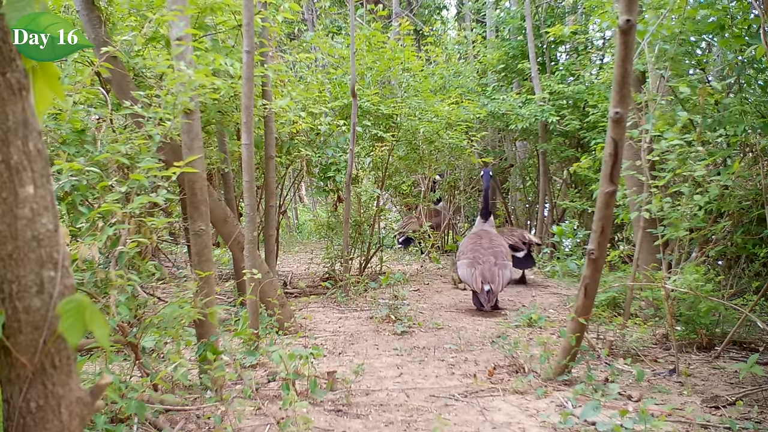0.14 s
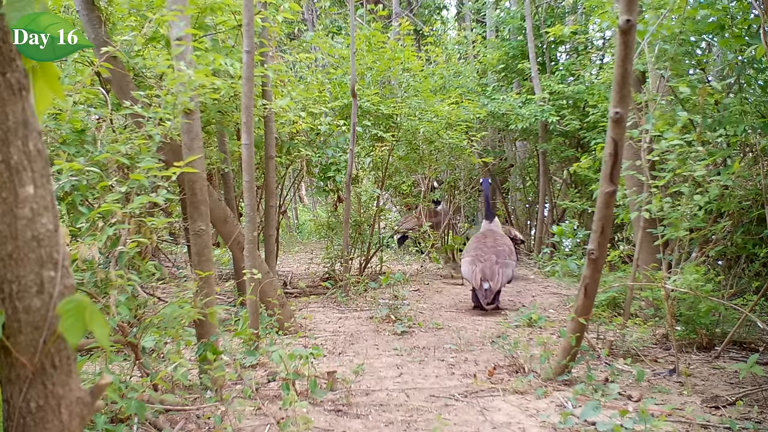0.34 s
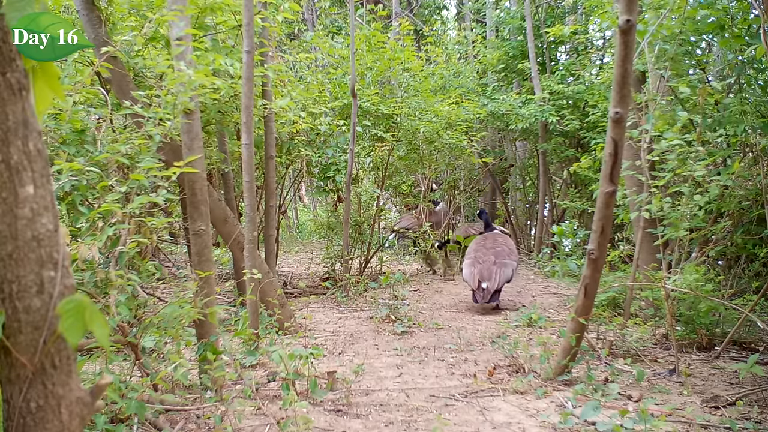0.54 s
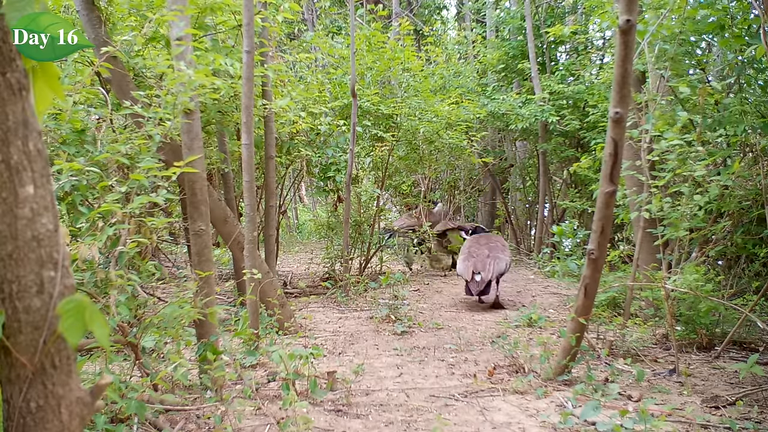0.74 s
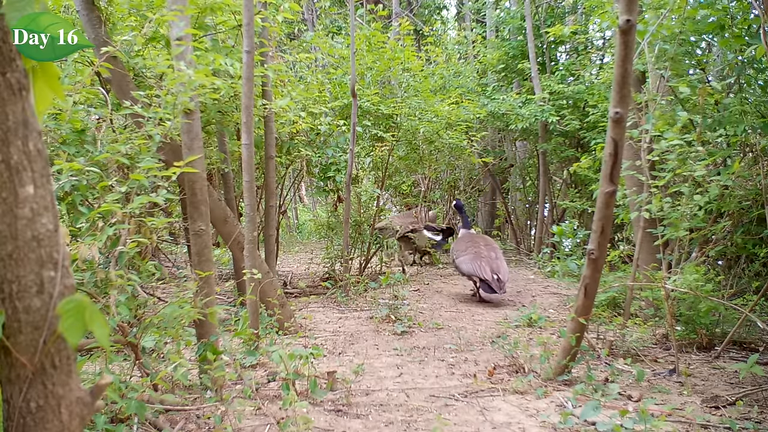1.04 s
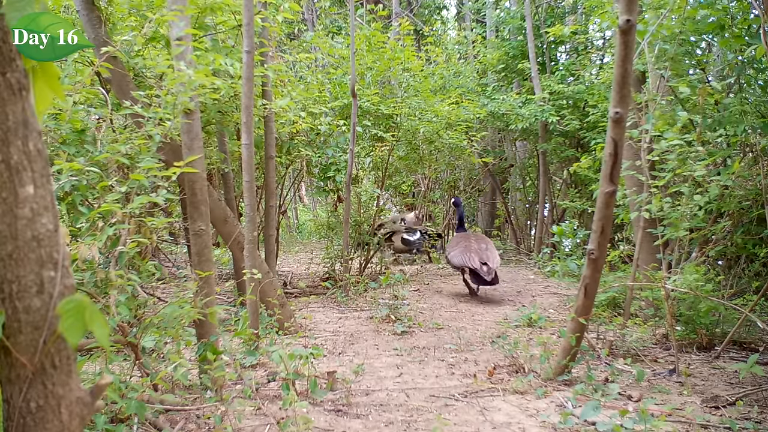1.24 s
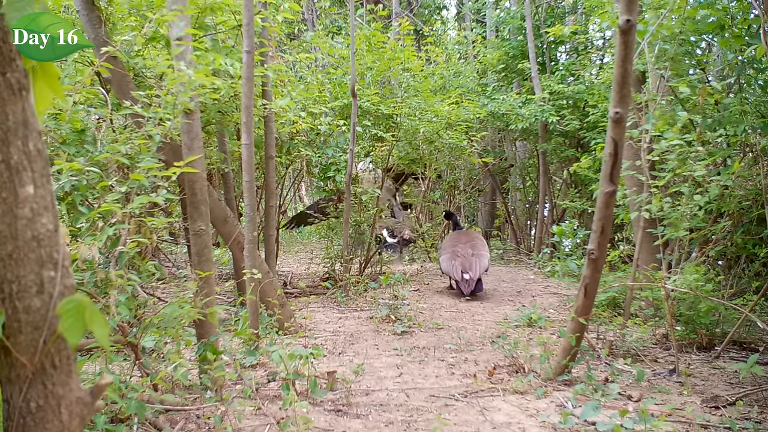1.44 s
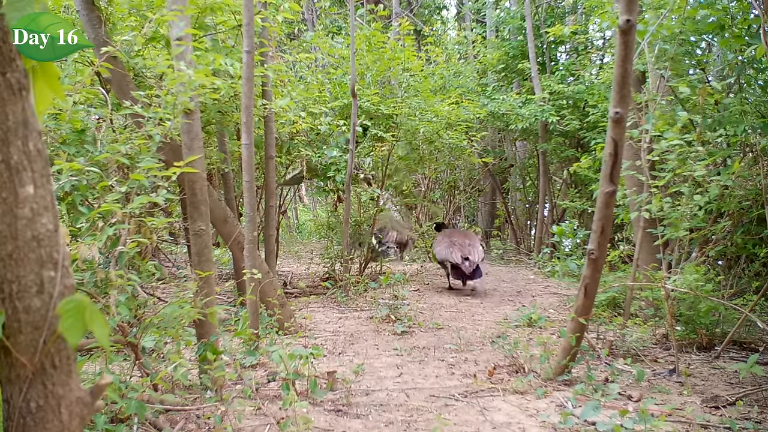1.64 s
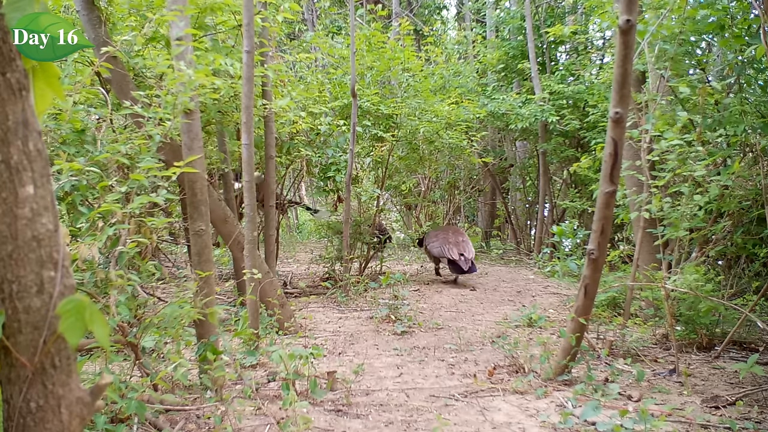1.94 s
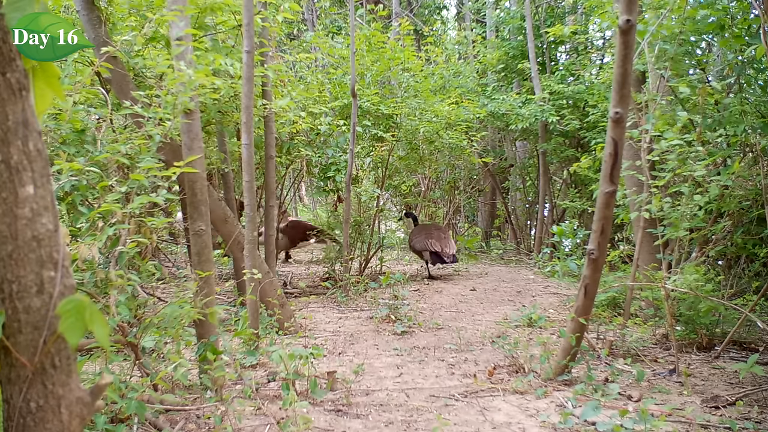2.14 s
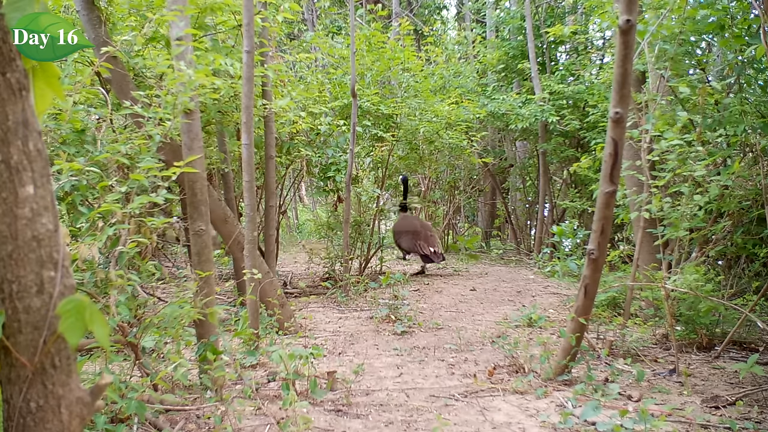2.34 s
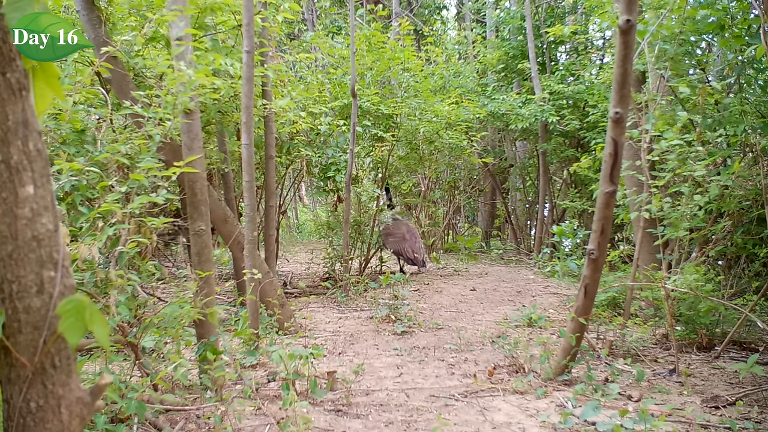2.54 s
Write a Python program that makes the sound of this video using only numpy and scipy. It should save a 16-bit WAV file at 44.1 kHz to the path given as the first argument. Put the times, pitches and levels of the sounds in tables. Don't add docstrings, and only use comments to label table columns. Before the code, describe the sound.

Several geese honk in quick, short, overlapping bursts with grunts and rasps in a small wood

```python
import sys
import numpy as np
from scipy import signal
from scipy.fft import rfft, irfft, next_fast_len
from scipy.io import wavfile
from scipy.ndimage import uniform_filter1d, map_coordinates

SR = 44100
rng = np.random.default_rng(int(sys.argv[2]) if len(sys.argv) > 2 else 0)


def convert_level_to_amplitude(level_db):
    exponent = np.asarray(level_db, float) / 20
    return 10 ** exponent


def file_out(sig):
    cols = np.atleast_2d(sig).T
    lim = np.clip(cols, -1, 1)
    pcm = np.round(lim * 32767).astype(np.int16)
    wavfile.write(sys.argv[1], SR, pcm)


N = 119070


def unit(x):
    return x / np.sqrt(np.mean(x ** 2) + 1e-20)


def along(points, hz):
    f, v = np.transpose(points)
    return np.interp(np.log(hz + 1), np.log(f + 1), v, left=-120)


def wobble(rate, size=N):
    knots = rng.standard_normal(int(size * rate / SR) + 4)
    return map_coordinates(knots, [np.arange(size) * rate / SR])


def coloured(x, spectrum):
    m = next_fast_len(N + 8192)
    gain = convert_level_to_amplitude(along(spectrum, np.fft.rfftfreq(m, 1 / SR)))
    return unit(irfft(rfft(x, m) * gain, m)[:N])


def swell(u, peak, sharp):
    peak = np.clip(peak, .05, .95)
    ramp = np.minimum(u / peak, (1 - u) / (1 - peak))
    return np.sin(np.pi / 2 * np.clip(ramp, 0, 1)) ** sharp


def add(out, s, x):
    part = out[round(s * SR):][:len(x)]
    part += x[:len(part)]


# (frequency [Hz], density [dB per Hz])
HUM_COLOUR = [(88, -45.5), (150, -11), (351, -8), (425, -5.5), (601, -3), (715, -3), (1410, -5.5),
              (1760, -6.5), (9500, -44), (12400, -71), (20900, -120)]


def distant_hum():
    z = signal.stft(rng.standard_normal(N), nperseg=512)[2]
    field = uniform_filter1d(rng.standard_normal(z.shape), 6, 0)
    field = uniform_filter1d(field, 10, 1)
    patchy = signal.istft(z * convert_level_to_amplitude(0.86 * unit(field)), nperseg=512)[1][:N]
    return convert_level_to_amplitude(-42.5 + 0.17 * wobble(2.9)) * coloured(patchy, HUM_COLOUR)


# (frequency [Hz], density [dB per Hz])
RUMBLE_COLOUR = [(15, 12), (30, 11.5), (55, 1.5), (90, -2.5), (125, 6.5), (160, -13), (250, -65)]
# (time [s], level [dB])
WIND_GUST = [(0, 0.5), (1.9, -0.5), (2.1, 2), (2.7, 0)]


def wind_rumble():
    gust_db = np.interp(np.arange(N) / SR, *np.transpose(WIND_GUST))
    rumble = coloured(rng.standard_normal(N), RUMBLE_COLOUR)
    return convert_level_to_amplitude(-56.5 + gust_db + wobble(1.7)) * rumble


def wind_puff(t):
    start_s, length_s, pitch_hz, level_db = 1.19, .08, 45, -46
    push = swell((t - start_s) / length_s, peak=.5, sharp=2)
    return convert_level_to_amplitude(level_db) * push * np.sin(2 * np.pi * pitch_hz * t)


# (frequency [Hz], density [dB per Hz])
HISS_COLOUR = [(6000, -2.5), (9000, 0), (15600, -3.5)]


def microphone_hiss():
    return convert_level_to_amplitude(-80) * coloured(rng.standard_normal(N), HISS_COLOUR)


# (frequency [Hz], level [dB])
CLOCK_TONES = [(10002, -101), (10998, -101), (11999, -102), (13001, -104)]


def camera_whine(t):
    whine_hz, flip_hz, whine_db = 7824.5, 29.6, -70
    flip = np.tanh(12 * np.sin(2 * np.pi * flip_hz * t))
    whine = convert_level_to_amplitude(whine_db) * np.sqrt(2) * np.sin(2 * np.pi * whine_hz * t) * flip
    clock = sum(np.sqrt(2) * convert_level_to_amplitude(db) * np.sin(2 * np.pi * hz * t) for hz, db in CLOCK_TONES)
    return whine + clock


# (delay [s], level [dB])
TRUNK_ECHOES = [
    (.021, -19),
    (.037, -17),
    (.058, -20),
    (.085, -22),
]
# (frequency [Hz], time [s])
WOOD_FADE = [(300, .18), (1400, .24), (5000, .14)]


def wood(x):
    hz, t, z = signal.stft(rng.standard_normal(SR // 2), SR, nperseg=256)
    fade = convert_level_to_amplitude(-60 * t / np.abs(along(WOOD_FADE, hz))[:, None])
    tail = signal.istft(z * fade, SR, nperseg=256)[1]
    tail *= convert_level_to_amplitude(-15) / np.linalg.norm(tail)
    for s, db in TRUNK_ECHOES:
        tail[round(s * SR)] += convert_level_to_amplitude(db)
    highpass = signal.butter(2, 975, "high", fs=SR, output="sos")
    return signal.fftconvolve(signal.sosfilt(highpass, x), tail)[:N]


# (start [s], length [s], level [dB])
MOVEMENTS = [(0.489, 0.14, -37.5), (0.605, 0.021, -38), (0.741, 0.29, -40.5), (0.757, 0.0042, -48),
             (0.885, 0.11, -35), (1.084, 0.095, -49), (1.345, 0.068, -33.5), (1.492, 0.0039, -33.5),
             (1.493, 0.094, -46), (1.608, 0.011, -33.5), (2.048, 0.018, -39.5), (2.024, 0.091, -44.5),
             (2.361, 0.087, -40), (2.499, 0.036, -45.5)]
# (frequency [Hz], density [dB per Hz])
LEAF_COLOUR = [(300, -17.5), (1000, 13), (2500, 9.5), (4500, -2.5), (7000, -15.5), (9000, -29),
               (12000, -55)]


def rustles():
    effort = np.zeros(N)
    for s, length, db in MOVEMENTS:
        u = np.arange(round(length * SR)) / SR / length
        add(effort, s, convert_level_to_amplitude(db) * swell(u, peak=.45, sharp=.7))
    crackles_per_s, spread_db = 1500, 3
    draw = rng.random((2, N))
    crackles = (draw[0] < crackles_per_s / SR) * convert_level_to_amplitude(-spread_db * np.log(draw[1] + .02))
    grain = (2.2 + unit(crackles)) * rng.standard_normal(N)
    return effort * convert_level_to_amplitude(1.5 * wobble(70)) * coloured(grain, LEAF_COLOUR)


# (frequency [Hz], density [dB per Hz])
BREATH_COLOUR = [(300, -26.5), (600, -17), (1300, 0), (1900, -6.5), (3000, -11), (4500, -31), (7000, -43),
                 (9500, -63.5)]


def breath():
    return coloured(rng.standard_normal(N), BREATH_COLOUR)


# (pitch jitter [fraction], air [dB], cycles per uneven pattern [count], undertones [dB])
CLEAR_VOICE = (.006, -20, 2, -30)
REEDY_VOICE = (.007, -20, 3, -17)
BROKEN_VOICE = (.005, -16, 2, -6)
BUZZY_VOICE = (.008, -11, 2, -18)
GARGLED_VOICE = (.003, -22, 3, -10)
RINGING_VOICE = (.008, -18, 2, -11)
THROBBING_VOICE = (.004, -19, 8, -15)


def voice(hz, throat, quality, air, shut_db=None):
    jitter, air_db, cycles, under_db = quality
    n, size = len(hz), 8192
    hz = hz * (1 + jitter * wobble(130, size)[:n])
    turn = 2 * np.pi * np.cumsum(hz) / SR
    k = np.arange(1, 61)[:, None] / cycles
    knots, at = rng.standard_normal((len(k), 16)), np.arange(n) * 70 / SR
    i = at.astype(int)
    flicker_db = 3 * (knots[:, i] * (i + 1 - at) + knots[:, i + 1] * (at - i))
    db = along(throat, k * hz) + (under_db + 3 * wobble(45, size)[:n]) * (k % 1 > 0)
    waves = np.cos(k * turn + .6 * rng.standard_normal(k.shape))
    if shut_db is None:
        tone = unit((convert_level_to_amplitude(db + flicker_db) * waves).sum(0))
    else:
        db = db - along(throat, 2 * hz) + flicker_db * (k != 2)
        db = np.where(k == 1, shut_db, db)
        tone = np.sqrt(2) * (convert_level_to_amplitude(db) * waves).sum(0)
    return tone + convert_level_to_amplitude(air_db) * np.resize(air, n) * (1 + .7 * np.cos(turn))


def goose(calls, throat, quality, arch, peak, sharp):
    out, air = np.zeros(N), breath()
    for s, length, first_hz, last_hz, db in calls:
        u = np.arange(round(length * SR)) / SR / length
        hz = (first_hz + (last_hz - first_hz) * u) * (1 + arch * np.sin(np.pi * u))
        call = voice(hz, throat, quality, air[round(s * SR):])
        add(out, s, convert_level_to_amplitude(db) * swell(u, peak, sharp) * call)
    return out


def near_goose(honks, throat, quality):
    out, air = np.zeros(N), breath()
    for s, *controls in map(np.transpose, honks):
        t = np.arange(s[0], s[-1], 1 / SR)
        hz, db, shut_db = [np.interp(t, s, c) for c in controls]
        edge = np.clip(np.minimum(t - s[0], s[-1] - t) / .004, 0, 1)
        honk = voice(hz, throat, quality, air[round(s[0] * SR):], shut_db)
        add(out, s[0], convert_level_to_amplitude(db) * edge * honk)
    return out


# (start [s], length [s], first pitch [Hz], last pitch [Hz], level [dB])
MOAN_CALLS = [
    (.19, .045, 182, 190, -48),
    (.75, .07, 430, 440, -45),
    (.856, .115, 445, 452, -38),
    (2.106, .105, 402, 355, -44),
    (2.225, .135, 172, 180, -47),
]
# (frequency [Hz], level [dB])
MOANING_THROAT = [(150, -4), (500, -9.5), (900, -25), (2000, -23.5), (9000, -85.5)]


def moans():
    return goose(MOAN_CALLS, MOANING_THROAT, CLEAR_VOICE, arch=0.0021, peak=0.45, sharp=0.21)


# (start [s], length [s], first pulse rate [Hz], last pulse rate [Hz], level [dB])
GRUNT_CALLS = [(.364, 0.045, 233.6, 257.7, -31), (.628, 0.04, 214.9, 229.2, -28.5),
               (.75, 0.13, 217.5, 229.4, -44), (1.112, 0.043, 184.2, 188, -28.5),
               (1.345, .03, 280, 285, -27), (2.11, .09, 199, 185, -42), (2.2, .15, 168, 176, -34),
               (2.285, 0.02, 168, 172, -33.5), (2.31, 0.027, 101.4, 105.4, -33),
               (2.341, 0.031, 151.2, 137.6, -29), (2.665, 0.17, 237.2, 206, -29.5)]
# (frequency [Hz], level [dB])
GRUNTING_THROAT = [(150, -58.5), (550, 2.5), (800, -8.5), (1050, 9.5), (1450, 4), (1900, -24), (2600, -13),
                   (9000, -64)]


def grunts():
    return goose(GRUNT_CALLS, GRUNTING_THROAT, BUZZY_VOICE, arch=.004, peak=.45, sharp=.8)


# (start [s], length [s], first pitch [Hz], last pitch [Hz], level [dB])
CACKLE_CALLS = [
    (.227, .036, 337, 325, -28),
]
LEAD_INS = [
    (.185, .05, 352, 388, -33),
]
# (frequency [Hz], level [dB])
CACKLING_THROAT = [(150, -22), (330, -40), (490, -3), (830, -3.5), (1300, 3.5), (1900, -3.5), (2600, -17.5),
                   (9000, -98.5)]


def cackles():
    lead_in = goose(LEAD_INS, CACKLING_THROAT, (.004, -18, 2, -14), arch=.005, peak=.2, sharp=.5)
    cackle = goose(CACKLE_CALLS, CACKLING_THROAT, BROKEN_VOICE, arch=0.0044, peak=0.14, sharp=0.8)
    return lead_in + cackle


# (start [s], length [s], first pitch [Hz], last pitch [Hz], level [dB])
SQUEAK_CALLS = [
    (.495, 0.028, 626, 672, -34.5),
]
RASP_CALLS = [
    (.51, .08, 336.5, 339, -33.5),
    (.578, 0.039, 334, 327.4, -33.5),
]
GARGLE_CALLS = [
    (.872, .11, 217.5, 225.4, -32.5),
]
# (frequency [Hz], level [dB])
OPEN_THROAT = [(150, -44), (500, -2), (1200, 5), (1700, -6), (2400, -3), (3300, -6), (5000, -19),
               (9000, -76)]


def rasps():
    squeak = goose(SQUEAK_CALLS, OPEN_THROAT, CLEAR_VOICE, arch=0.0054, peak=0.52, sharp=0.84)
    rasp = goose(RASP_CALLS, OPEN_THROAT, BROKEN_VOICE, arch=.012, peak=.3, sharp=.55)
    gargle = goose(GARGLE_CALLS, OPEN_THROAT, GARGLED_VOICE, arch=0.0031, peak=.55, sharp=0.94)
    return squeak + rasp + gargle


# (start [s], length [s], first pitch [Hz], last pitch [Hz], level [dB])
LOW_CALLS = [
    (.245, 0.036, 492, 469, -29.5),
    (.934, 0.061, 606.7, 588.5, -32.5),
    (2.11, 0.1076, 596, 533.6, -40),
]
# (frequency [Hz], level [dB])
LARGE_THROAT = [(300, -33), (560, -5), (850, -19.5), (1080, 3.5), (1300, -1), (1700, -17.5), (2300, -22.5),
                (9000, -76)]


def low_honks():
    return goose(LOW_CALLS, LARGE_THROAT, REEDY_VOICE, arch=.025, peak=.6, sharp=.7)


# (start [s], length [s], first pitch [Hz], last pitch [Hz], level [dB])
HIGH_CALLS = [
    (.232, 0.061, 701, 652, -29),
    (.343, 0.057, 643, 688, -30.5),
    (.407, 0.038, 707, 644, -20),
    (1.05, 0.051, 837, 794, -26.5),
    (1.58, 0.032, 805, 829, -25.5),
    (2.397, 0.038, 738, 632.5, -25),
]
# (time [s], pitch [Hz], ringing octave [dB], fundamental over it [dB])
BREAKING_HONK = [(1.348, 801.6, -23, -9), (1.374, 796.7, -15.5, -14.5), (1.384, 752, -30, -18),
                 (1.399, 730, -19.5, -12)]
# (frequency [Hz], level [dB])
SMALL_THROAT = [(400, -5.5), (750, -13), (1450, 5.5), (2050, -13), (2400, -8), (2800, -26.5), (5000, -46),
                (9000, -81)]


def high_honks():
    clear = goose(HIGH_CALLS, SMALL_THROAT, CLEAR_VOICE, arch=0.006, peak=0.35, sharp=1.1)
    return clear + near_goose([BREAKING_HONK], SMALL_THROAT, CLEAR_VOICE)


# (time [s], pitch [Hz], ringing octave [dB], fundamental over it [dB])
RINGING_HONKS = [
    [(.615, 502, -46, 4), (.64, 515, -40, 7), (.656, 545, -30, -1), (.68, 570, -20, -9),
     (.71, 570, -22, -16), (.728, 562, -42, -11)],
    [(1.061, 548, -48, 6), (1.072, 553, -31, 1), (1.082, 560, -24, -4), (1.098, 590, -17, -11),
     (1.112, 582, -26, -5), (1.127, 572, -20, -20), (1.139, 565, -34, -14)],
    [(1.311, 512, -50, 3), (1.32, 524, -33, 1), (1.338, 550, -23, -7), (1.351, 578, -17, -14),
     (1.363, 572, -22, -12), (1.374, 570, -34, -16)],
    [(1.593, 530, -50, 2), (1.602, 550, -32, -2), (1.612, 572, -22, -9), (1.625, 592, -17, -14),
     (1.647, 582, -19, -25), (1.662, 588, -35, -22)],
]
LAST_HONK = [(2.328, 526, -39, -9), (2.345, 524, -28, -7), (2.365, 519, -25, -11), (2.385, 515, -25, -12),
             (2.402, 500, -29, -7), (2.417, 462, -39, 2), (2.436, 443, -50, 3)]
# (start [s], length [s], first pitch [Hz], last pitch [Hz], level [dB])
THROB_CALLS = [
    (2.334, .075, 618, 642, -21),
]
# (frequency [Hz], level [dB])
NEAREST_THROAT = [(300, -30), (880, -20), (1010, 0), (1400, -2), (1650, -14), (2300, -21), (3400, -30),
                  (9000, -68)]


def near_honks():
    honks = near_goose(RINGING_HONKS + [LAST_HONK], NEAREST_THROAT, RINGING_VOICE)
    throb = goose(THROB_CALLS, NEAREST_THROAT, THROBBING_VOICE, arch=.008, peak=.5, sharp=.7)
    return honks + throb


def scene():
    geese = moans() + grunts() + cackles() + rasps() + low_honks() + high_honks() + near_honks()
    near = geese + rustles()
    return (near + wood(near) + distant_hum() + wind_rumble())[None]


def low_pass(x):
    return signal.sosfilt(signal.butter(12, 15500, fs=SR, output="sos"), x)


def record(dry):
    t = np.arange(N) / SR
    lowpass = signal.butter(6, 9000, fs=SR, output="sos")
    softened = signal.sosfilt(lowpass, dry)
    fade = np.clip((t[-1] - t) / .006, 0, 1)
    mix = fade * (softened + camera_whine(t) + wind_puff(t) + microphone_hiss())
    return low_pass(mix)


dry = scene()
out = record(dry)
file_out(out)
```